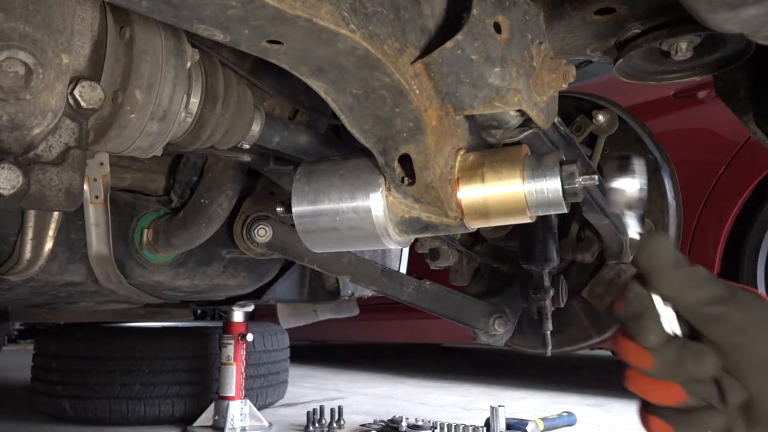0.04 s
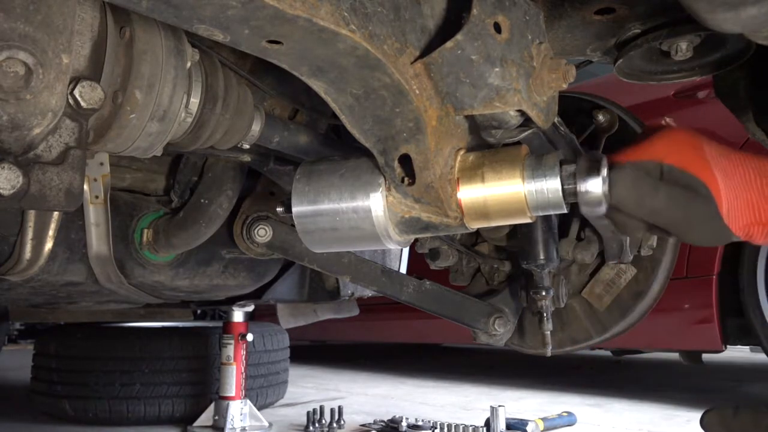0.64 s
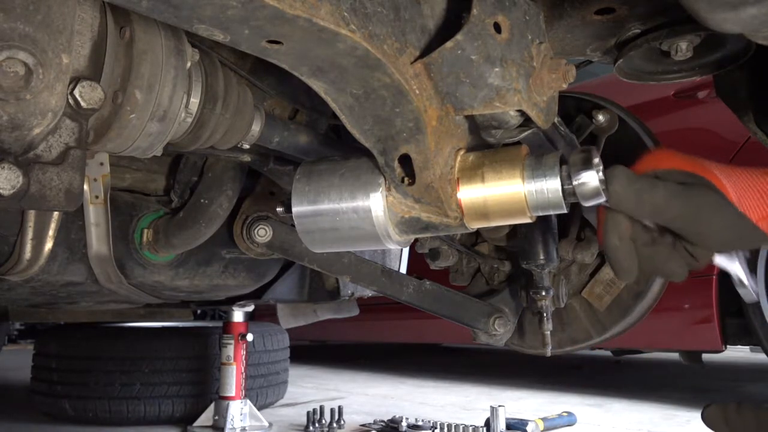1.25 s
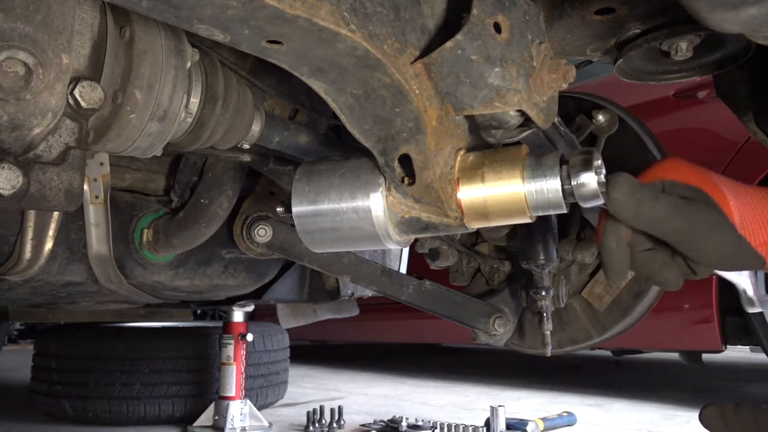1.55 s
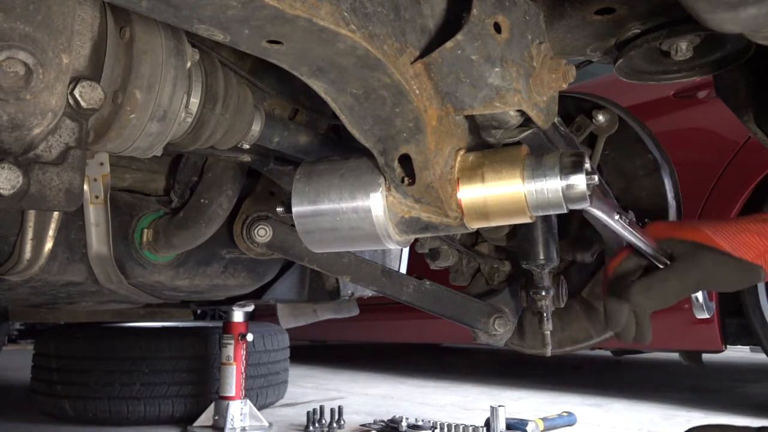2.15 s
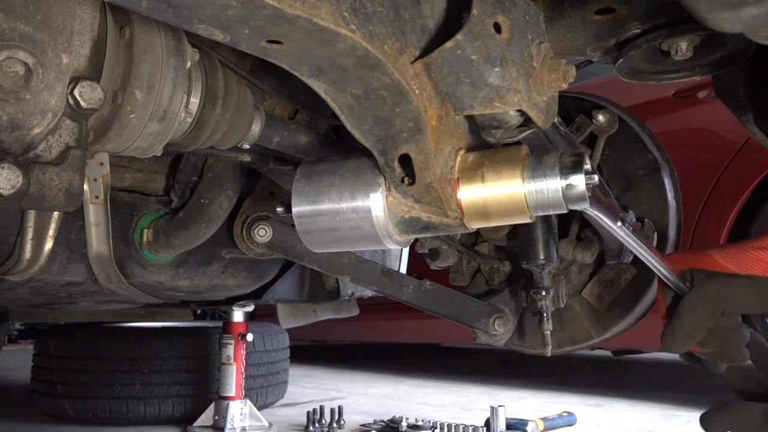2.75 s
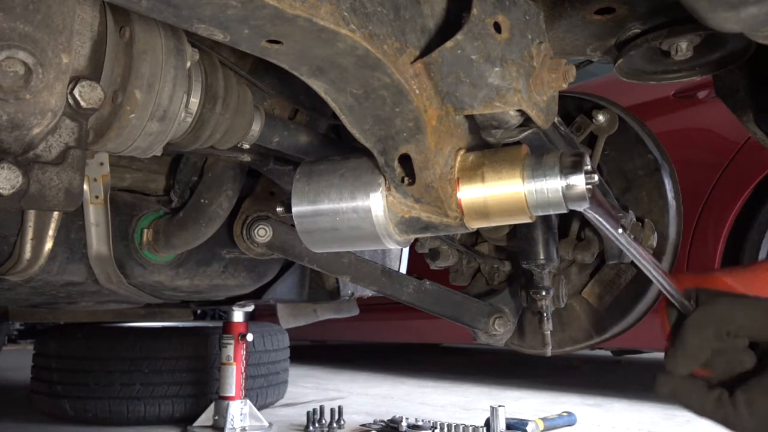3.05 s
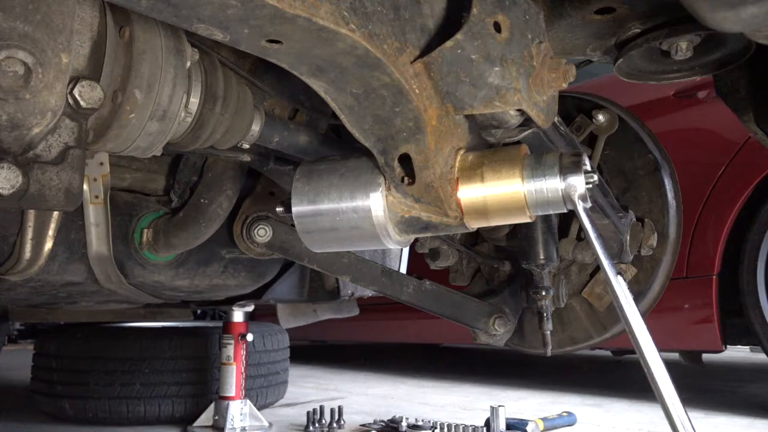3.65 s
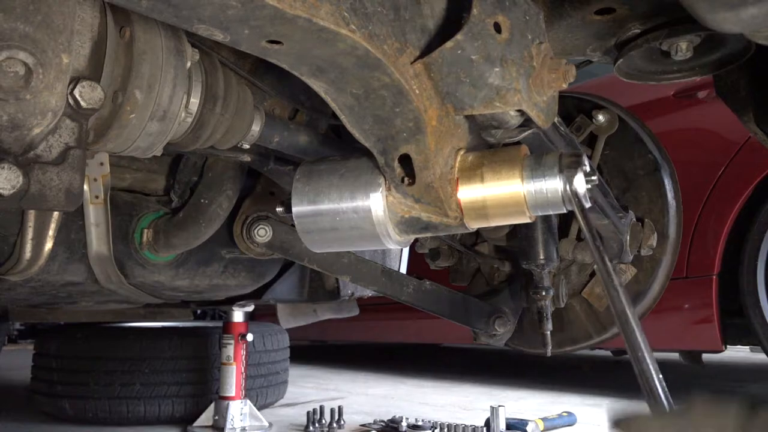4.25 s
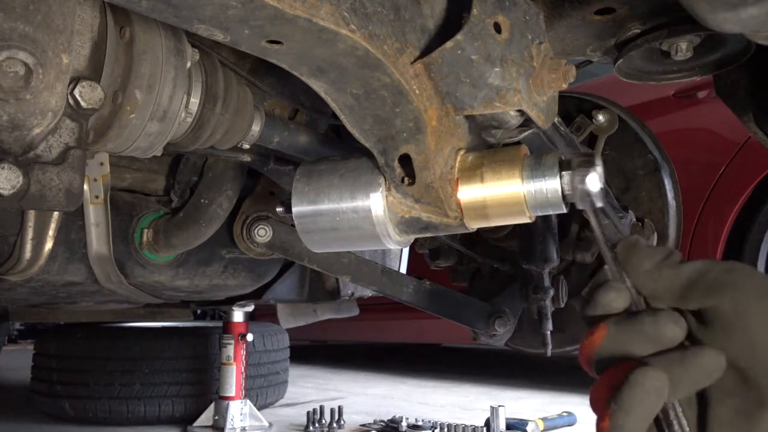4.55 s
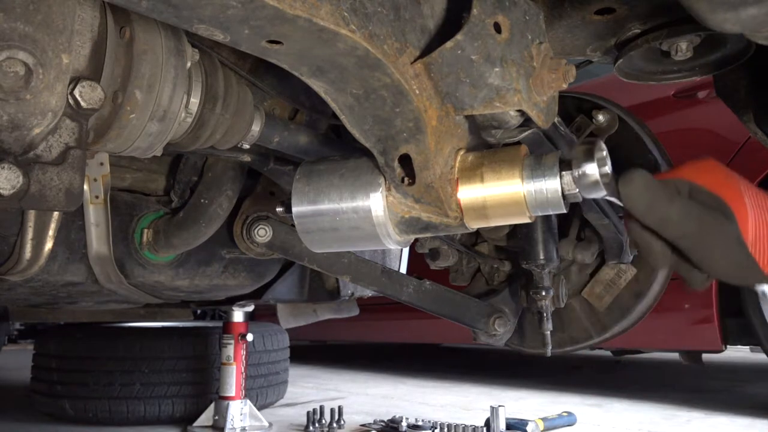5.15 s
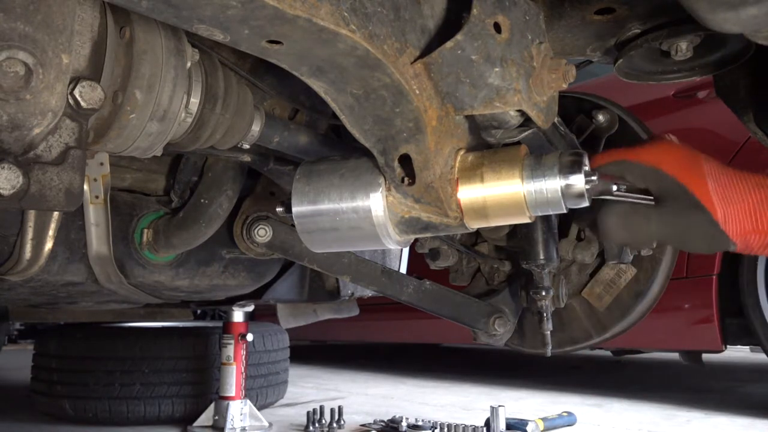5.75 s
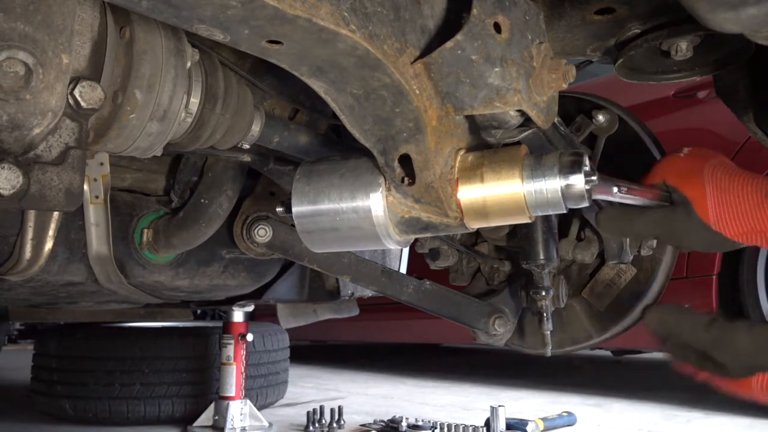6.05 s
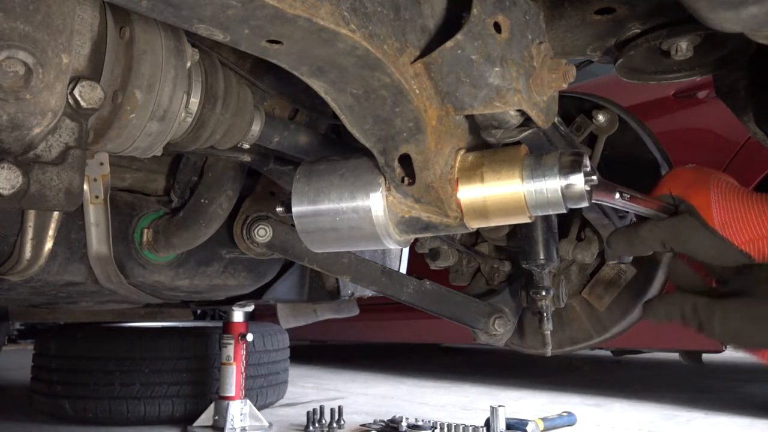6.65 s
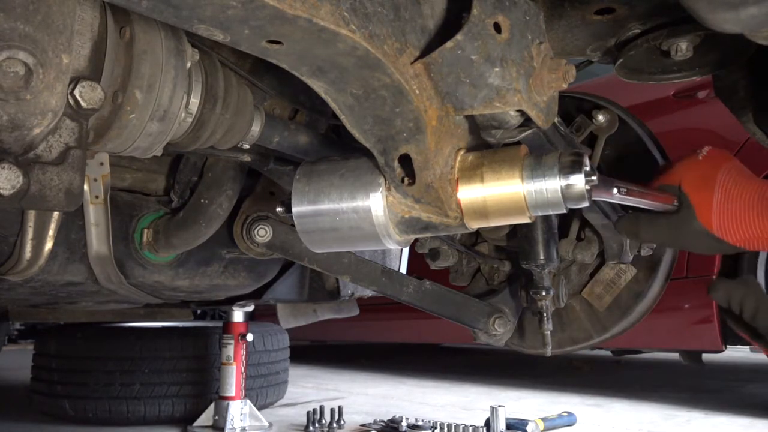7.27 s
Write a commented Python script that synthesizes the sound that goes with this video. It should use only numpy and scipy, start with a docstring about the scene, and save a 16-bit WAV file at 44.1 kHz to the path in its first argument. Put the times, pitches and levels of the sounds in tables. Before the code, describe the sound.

Steel clacks and clinks irregularly as a wrench is set on a nut, each knock ringing briefly through a car's suspension and echoing in the wheel well. Cloth swishes and a thread rubs under load, swelling toward the middle. Then the wrench clanks off and back on, followed by more rustle and a few faint ticks. A low garage hum and thin whine continue underneath, with the impacts centred in front of the microphone.

```python
"""Steel clacks on steel: a ratchet wrench is worked onto the nut of a bushing press under a car,
pulled, lifted off and set on again. Each impact passes through the press into the suspension arm;
wrench, screw and arm ring in their damped normal modes, and the wheel well reverberates.
Between the knocks, sliding friction makes a sleeve rustle and the loaded thread rub,
with a few small taps and two short squeaks, over the low hum and faint whine of a garage."""
import sys
import numpy as np
from scipy import signal
from scipy.fft import rfft, irfft
from scipy.io import wavfile
from scipy.ndimage import uniform_filter1d

SR = 44100
rng = np.random.default_rng(int(sys.argv[2]) if len(sys.argv) > 2 else 0)


def file_out(sig):
    """Save sig as 16-bit WAV at sys.argv[1]."""
    # one column per channel
    cols = np.atleast_2d(sig).T
    # limit, then scale
    lim = np.clip(cols, -1, 1)
    pcm = np.round(lim * 32767).astype(np.int16)
    wavfile.write(sys.argv[1], SR, pcm)


N = 326781


def undb(db):
    """Amplitude ratio of a level in decibels."""
    return 10 ** (np.asarray(db) / 20)


def at(hz, points):
    """Interpolation of an (f/Hz, value) table on a logarithmic frequency axis."""
    f, value = np.transpose(points)
    return np.interp(np.log(hz + 1e-3), np.log(np.sort(f)), value)


def colour(hz, points):
    """Magnitude response of an (f/Hz, level/dB) table, rolling off beyond its ends."""
    low_cut = 1 + (.8 * points[0][0] / (hz + 1e-3)) ** 4
    high_cut = 1 + (.8 * hz / points[-1][0]) ** 8
    return undb(at(hz, points)) / low_cut / high_cut


def resonances(hz, peaks):
    """Magnitude response of Lorentzian peaks or dips, summed in decibels."""
    return undb(sum(db / (1 + (2 * (hz - f) / width) ** 2) for f, width, db in peaks))


def bins(size):
    """Frequencies of the Fourier transform of size samples."""
    return np.arange(size // 2 + 1) * SR / size


def shaped(spectrum, gain, size):
    """Source and filter: the waveform of a weighted spectrum, at unit rms."""
    x = irfft(spectrum * gain, size)
    return x / np.sqrt(np.mean(x ** 2))


def drift(rate_hz):
    """Low-pass random fluctuation with a standard deviation near 1."""
    hold = int(SR / rate_hz)
    steps = np.repeat(rng.standard_normal(N // hold + 1), hold)
    return np.sqrt(2) * uniform_filter1d(uniform_filter1d(steps, hold), hold)[:N]


def decay(t, t60):
    """Exponential damping from t = 0, by 60 dB in t60 seconds."""
    return np.exp(-np.log(1000) * np.maximum(t, 0) / t60)


def add(out, x, start_s):
    """Superposition of x on out from a given time."""
    i = int(round(start_s * SR))
    lo, hi = max(i, 0), min(i + x.shape[1], N)
    out[:, lo:hi] += x[:, lo - i:hi - i]


# Stereo width of the sound field: f/Hz, side minus mid level/dB
STEREO_WIDTH = [(60, -28.5), (130, -24.5), (260, -18), (600, -11.5), (1300, -8), (2600, -8), (5000, -2),
                (12000, -0.5)]

def grains(size, spread_db):
    """Stereo spectrum of noise in tiny uneven bursts; the ears are most coherent in the bass."""
    amplitudes = undb(spread_db * np.repeat(rng.standard_normal(size // 16 + 1), 16)[:size])
    mid, side = rfft(rng.standard_normal((2, size)) * amplitudes)
    side = side * undb(at(bins(size), STEREO_WIDTH))
    return np.array([mid + side, mid - side])


# Spectrum of the room noise: f/Hz, level/dB
ROOM_SPECTRUM = [(13, -34.5), (22, 0), (124, 0.5), (150, -1.5), (253, -13.5), (371, -20), (592, -17),
                 (846, -20.5), (944, -20.5), (2150, -28.5), (2830, -26.5), (3430, -42), (5030, -32),
                 (5770, -41), (11000, -36), (15500, -42)]
# Peaks in its hiss: f/Hz, bandwidth/Hz, gain/dB
HISS_PEAKS = [(3070, 330, 8), (4800, 300, 4)]
# Tones of the hum: f/Hz, level/dB
HUM_TONES = [(119, -61), (430.7, -76.5)]

def garage(noise_db=-51.5, waver_db=.8):
    """Ambient noise: a continuous spectrum of rumble and hiss, plus two phase-modulated tones."""
    hz, t = bins(N), np.arange(N) / SR
    air = shaped(grains(N, spread_db=0), colour(hz, ROOM_SPECTRUM) * resonances(hz, HISS_PEAKS), N)
    hum = sum(np.sqrt(2) * undb(db) * np.sin(2 * np.pi * f * t + .5 * drift(4)) for f, db in HUM_TONES)
    return air * undb(noise_db + waver_db * drift(4.48)) + hum


# Envelope of the background whine: t/s, level/dB
WHINE_ENVELOPE = [(0, -69), (2.4, -66), (3.0, -65), (4.1, -68), (6.1, -67), (6.5, -61), (6.9, -66),
                  (7.41, -68)]

def whine(centre_hz=2870, wander_hz=60):
    """Narrow-band noise: random quadrature modulation of a carrier that wanders in pitch."""
    phase = 2 * np.pi * np.cumsum(centre_hz + wander_hz * drift(6)) / SR
    ears = np.array([drift(300) * np.cos(phase) + drift(300) * np.sin(phase) for _ in range(2)])
    times, db = np.transpose(WHINE_ENVELOPE)
    envelope = np.interp(np.arange(N) / SR, times, undb(db), left=0, right=0)
    return ears * uniform_filter1d(envelope, size=600)


# Spectrum of rubbing cloth: f/Hz, level/dB
CLOTH_SPECTRUM = [(240, -30), (400, -12), (1300, -4.5), (1470, -2.5), (1850, 0.5), (2090, -4), (2970, -4.5),
                  (3460, -8.5), (5230, -4.5), (6680, -7.5), (11800, -3.5), (15500, -18)]
# Sweeps of the sleeve: t/s, duration/s, level/dB, gain of the body from pressure/dB
SLEEVE_SWEEPS = [(0.045, .3, -54, 2), (1.971, 0.26, -41.5, -4), (2.0, 0.83, -64.5, -17),
                 (2.277, .12, -40, -11), (2.6, 0.75, -61.5, -1), (3.076, 0.059, -57, -4),
                 (3.154, 1.07, -54, 1.5), (3.643, .31, -39, 2.5), (4.128, 0.26, -40.5, 3),
                 (4.233, .32, -42.5, -0.5), (4.747, .2, -50.5, -5), (5.725, 0.26, -43, 2.5),
                 (5.845, 0.46, -59, 6), (6.492, 0.27, -68, 9), (6.864, 0.29, -49, 2.5),
                 (7.11, .18, -47.5, -3), (7.21, 0.25, -62, 6)]

def sleeve(gain_db=1.5, flutter_db=1.0, split_hz=4000, skew=1.12, speed_exponent=1.3):
    """Friction noise of fibres grows as a power of speed; pressure adds body below the hiss."""
    hz, t = bins(N), np.arange(N) / SR
    cloth = colour(hz, CLOTH_SPECTRUM) * resonances(hz, [(5280, 380, 6.2)])
    fibres = shaped(grains(N, spread_db=2.5), cloth, N)
    body = irfft(rfft(fibres) / (1 + (hz / split_hz) ** 8), N)
    hiss_power, body_power = 0, 0
    for start_s, length_s, level_db, pressure_db in SLEEVE_SWEEPS:
        progress = np.clip((t - start_s) / length_s, 0, 1)
        speed = np.abs(np.sin(np.pi * progress ** skew))  # rises more slowly than it falls
        amplitude = undb(level_db) * speed ** speed_exponent
        hiss_power += amplitude ** 2
        body_power += (undb(pressure_db) * amplitude) ** 2
    rustle = (fibres - body) * np.sqrt(hiss_power) + body * np.sqrt(body_power)
    return rustle * undb(gain_db + flutter_db * drift(45))


# Spectrum of the rubbing thread: f/Hz, level/dB
THREAD_SPECTRUM = [(150, -40), (250, -14.5), (416, -7), (481, -12), (563, -3), (657, -3.5), (714, -14),
                   (976, -10), (1320, -10), (1690, -16), (3000, -18.5), (3900, -29), (6600, -120)]

def thread(full_at_s=3.729, hold_s=.12, full_db=-40, build_db_per_s=55, ease_db_per_s=165, judder_db=.5):
    """Stick-slip in the thread drives a resonance of the suspension arm, louder with the load."""
    hz, t = bins(N), np.arange(N) / SR - full_at_s
    response = colour(hz, THREAD_SPECTRUM) * resonances(hz, [(575, 140, 4.2)])
    slips = shaped(grains(N, spread_db=5), response, N)
    load_db = build_db_per_s * np.minimum(t, 0) - ease_db_per_s * np.maximum(t - hold_s, 0)
    return slips * undb(full_db + load_db + judder_db * drift(60))


BLOW_SIZE, LEAD_S = 49152, .06  # samples in one impact; time allowed for the slide before a knock

def burst(centre_hz, width_hz, db, t60):
    """A damped resonance under noise excitation: a decaying band of noise."""
    hz, t = bins(BLOW_SIZE), np.arange(BLOW_SIZE) / SR
    band = 1 / (1 + ((hz ** 2 - centre_hz ** 2) / (width_hz * (hz + 1))) ** 2)
    return undb(db) * decay(t, t60) * shaped(grains(BLOW_SIZE, spread_db=8), band, BLOW_SIZE)


# Small dry taps, ticks and two short squeaks: t/s, f/Hz, bandwidth/Hz, level/dB, T60/s, bump level/dB
TAPS_AND_SQUEAKS = [(0.862, 1503, 160, -30.5, .2, -60), (1.001, 1540, 140, -29, .18, -56),
                    (2.536, 286, 129, -42.5, 0.17, -55), (2.77, 600, 250, -51, 0.088, -62),
                    (2.943, 2410, 3000, -53, 0.087, -79), (3.016, 9900, 4950, -48, 0.052, -73),
                    (3.848, 1800, 1300, -18, 0.026, -47), (4.141, 1323, 260, -34, 0.036, -38),
                    (4.156, 1380, 260, -32, 0.062, -31.5), (4.178, 1440, 260, -41, 0.33, -36)]

def taps_and_squeaks(rise_s=.0011):
    """Damped resonance: each tap, tick or squeak is one decaying band over a dull bump."""
    out, t = np.zeros((2, N)), np.arange(BLOW_SIZE) / SR
    for start_s, centre_hz, width_hz, db, t60, bump_db in TAPS_AND_SQUEAKS:
        resonance = burst(centre_hz, width_hz, db, t60)
        bump = burst(centre_hz=165, width_hz=220, db=bump_db, t60=.11)
        add(out, (resonance + bump) * (1 - np.exp(-t / rise_s)), start_s)
    return out


def strike_point(hz, ripple_db=3, spacing_hz=130):
    """Modal excitation depends on position: each new spot favours other resonances."""
    grid = spacing_hz * np.arange(256)
    return undb(ripple_db * np.interp(hz, grid, rng.standard_normal(len(grid))))


# Spectrum of the struck press and suspension arm: f/Hz, level/dB
STEEL_SPECTRUM = [(60, -13), (130, -9), (260, -15.5), (390, -14.5), (490, -12.5), (660, -4), (820, 3),
                  (1160, 0.5), (1290, -8), (1550, -3), (3000, -10), (5500, -14), (11600, -25),
                  (12500, -36.5), (15000, -42)]
# Resonances of the socket and press cups: f/Hz, bandwidth/Hz, gain/dB
CUP_RESONANCES = [(2238, 33, 5.5), (2580, 220, 5), (3042, 200, 5), (3950, 300, 4.5), (4316, 35, 13),
                  (5250, 840, 7), (8420, 280, 5.5), (11100, 85, 10.5), (11400, 220, 13)]
# Directivity of the blows: f/Hz, left minus right level/dB
DIRECTIVITY = [(150, -0.4), (500, 1.6), (1100, 2.5), (2500, 1.4), (5000, 0.2), (9000, 0.5), (14000, -2)]
# Five bands, thud to tick: low f/Hz, high f/Hz, echo level/dB, early T60/s, late T60/s, late level/dB
BANDS = [(86, 450, -3.5, 0.29, 0.98, 10.5), (440, 1330, -3.5, .15, 0.49, 7.5),
         (1430, 3130, 0.3, 0.082, 0.78, -1), (3270, 6400, -2.5, 0.067, 0.75, -7),
         (6360, 15500, -2.5, 0.11, 0.8, -8)]

def clack(drive_db, after_db, slide_s, hold_s=.0092):
    """Dense modes overlap into noise and reverberate in the wheel well with a double-slope decay."""
    hz, t = bins(BLOW_SIZE), np.arange(BLOW_SIZE) / SR - LEAD_S
    balance = undb(np.outer([.5, -.5], at(hz, DIRECTIVITY)))
    steel = colour(hz, STEEL_SPECTRUM) * resonances(hz, CUP_RESONANCES) * balance
    chatter = grains(BLOW_SIZE, spread_db=3) * strike_point(hz)
    blow = 0
    for db, (low_hz, high_hz, echo_db, early_t60, late_t60, late_db) in zip(drive_db, BANDS):
        band = steel / np.sqrt((1 + (low_hz / (hz + 1)) ** 10) * (1 + (hz / high_hz) ** 10))
        early = decay(t - hold_s, early_t60)
        late = undb(after_db + late_db) * decay(t, late_t60)
        blow += undb(db + echo_db) * np.hypot(early, late) * shaped(chatter, band, BLOW_SIZE)
    return blow * np.exp(np.minimum(t, 0) / slide_s)  # the slide grows into the blow


def ring(modes, drive_db, scatter_db, build_s, t60_scale=1):
    """Modal superposition: damped sinusoids build up while the contact chatters."""
    t = np.arange(BLOW_SIZE - int(LEAD_S * SR)) / SR
    out, ears = np.zeros((2, len(t))), np.array([[1], [-1]])
    edges_hz = [band[1] for band in BANDS[:-1]]
    for hz, db, t60 in modes:
        angle, ear_offset, scatter, grip = rng.standard_normal(4)
        t60 = t60 * t60_scale * undb(-abs(2 * grip))  # the grip damps each mode by chance
        age = t[:int(t60 * SR)]
        phase = np.pi * angle + ears * ear_offset * undb(at(hz, STEREO_WIDTH))
        level_db = db + drive_db[np.searchsorted(edges_hz, hz)] + scatter_db * scatter
        peak = np.sqrt(2) * undb(level_db + ears * at(hz, DIRECTIVITY) / 2)
        out[:, :len(age)] += peak * decay(age, t60) * np.sin(2 * np.pi * hz * age + phase)
    return out * (1 - np.exp(-t / build_s))


# Normal modes of the suspension arm: f/Hz, level/dB, T60/s
ARM_MODES = [(95, -20, 1.0), (181, -18, 1.2), (400, -11, .4), (441, -18, .9), (503, -23, .62),
             (664, -17, .25), (711, -23, .6), (786, -20, .6), (836, -12, .32), (908, -18, .42),
             (972, -12, .3), (1022, -12, .2), (1072, -14, .33), (1174, -5, .2), (1270, -24, .47),
             (1348, -13, .3), (1503, -11, .22), (1846, -15, .39), (2155, -11, .28), (2229, -22, .6),
             (2603, -12, .25), (3047, -26, .7)]

def suspension_arm(drive_db):
    """Structure-borne sound: the blow passes through the press and sets the arm ringing."""
    return ring(ARM_MODES, drive_db - 2, scatter_db=3.5, build_s=.0091)


# Normal modes of the forcing screw and its nut: f/Hz, level/dB, T60/s
SCREW_MODES = [(786, -25.5, .7), (3741, -24, .22), (4264, -15.5, .15), (4750, -28, .4), (5580, -9, 0.11),
               (5900, -4.5, .22), (8737, -18, .13), (9280, -10, 0.26), (10400, -9, .18),
               (11500, -12.5, 0.15), (14493, -20, .17)]

def screw(drive_db, freedom, loose_db=-11):
    """Mechanical coupling: the tick band drives the screw, weakly if the wrench hangs free."""
    tick_db = np.full_like(drive_db, drive_db[-1])
    return ring(SCREW_MODES, tick_db + freedom ** 2 * loose_db, scatter_db=7, build_s=.00078)


# Normal modes of the wrench: f/Hz, level/dB, T60 when hanging free/s
WRENCH_MODES = [(3640, -18, .15), (5363, -5.5, 0.23), (6540, -13.5, 0.72), (7460, -10.5, 0.4),
                (8528, -1, .22), (10900, -8.5, 0.65), (11742, -12, 0.52), (13425, -24, .25)]

def wrench(drive_db, freedom, gap_s, held_db=-10, free_gain_db=16.5, seat_t60=.12):
    """Contact damping: a loosely held wrench rings louder and longer, until the next contact."""
    ringing = ring(WRENCH_MODES, drive_db + held_db + freedom * free_gain_db,
                   scatter_db=-.5, build_s=.00041, t60_scale=np.clip(freedom, .35, 1))
    t = np.arange(ringing.shape[1]) / SR
    return ringing * decay(t - gap_s, seat_t60)


# Response of each band, thud to tick: level/dB, slope with hardness/(dB/dB), slope with weight/(dB/dB)
BAND_RESPONSE = [(0.5, 0, 1), (-3.5, -0.5233, 0.1646), (-0.78, 0, 0), (-5, 0.19, -.5), (-0.77, 1.14, 0)]
# Steel contacts: t/s, level/dB, hardness/dB (treble of a sharp contact), weight/dB (bass as the press
# shifts), after-ring level/dB, slide time constant/s, freedom of the wrench (0 held, 1 hanging)
STEEL_CONTACTS = [(0.022, -38, -7, 5.5, -21, 0.012, .2), (0.042, -29.5, -15, -5.5, -19, .0024, .7),
                  (0.3387, -30.5, 8.5, -9.5, -12, .0006, .1), (0.45, -40.5, -7.5, -11, -20.5, .017, .3),
                  (0.4991, -30, 13, -12, -9, .0005, .1), (0.687, -30.5, -2.5, -15, -25, 0.0036, .4),
                  (0.699, -23.5, -2, -20.5, -20.5, 0.0022, .6),
                  (0.7225, -20.5, -9, -18.5, -14.5, 0.00076, .4), (0.733, -23.5, -16, -9.5, -18, .0025, .3),
                  (0.868, -35, -14, -6, -28, 0.021, .3), (0.885, -20, -13.5, -17, -12.5, .0009, .2),
                  (0.997, -34.5, -14.5, -7, -18, 0.002, .4), (1.062, -21, -14.5, -10, -24.5, 0.0079, .2),
                  (1.071, -22.5, -25, -12, -23.5, 0.00077, .5), (1.098, -30, -16, -2, -23.5, 0.0043, .37),
                  (1.2553, -40.5, -24.5, -8, -14, .0004, .2), (1.309, -22, -23, -12.5, -18.5, .0004, .1),
                  (1.414, -36, -20, -0.5, -23, .003, .1), (1.472, -51, -23, 12.5, -22, 0.0072, .3),
                  (1.64, -29, -27, 1.5, -37, .002, .2), (1.77, -37.5, -27, 7.5, -30, .0006, .2),
                  (1.79, -29, -19, 2, -29, 0.0013, .3), (1.8197, -24.5, -11, -19, -3.5, 0.00045, .15),
                  (4.351, -47.5, -14.5, 5, -30, 0.01, .3), (4.436, -43, -24.5, 4, -29, 0.01, .3),
                  (4.471, -35.5, -20, -6.5, -29.5, .0005, .3), (4.586, -27.5, -15.5, -1.5, -26, 0.0035, .1),
                  (4.602, -25, -18, -3.5, -32, .004, .6), (4.668, -19.5, -18, -3.5, -13.5, 0.00027, 0.94),
                  (5.017, -53, -7.5, 0.5, -36.5, .001, .1), (5.105, -28.5, -3, -13, -14.5, 0.0014, 1),
                  (5.18, -25, 2, -12, -8, .0007, .55), (5.2555, -21.5, -7.5, -14.5, -16.5, 0.0015, .65),
                  (5.413, -21.5, -18, -4.5, -35, .0034, .3), (5.507, -38.5, -22.5, 6.5, -26, .0085, .25),
                  (5.599, -23, -9, -16, -5.5, .001, .2), (7.002, -55, -2, -2, -22, .002, .3),
                  (7.127, -42, 1.5, -11, -14, .013, .3), (7.375, -55, -11, -2, -7, 0.0042, .3)]

def knocks():
    """Impact excitation: a hard contact ticks, a soft one clunks, a heavy one thuds."""
    out = np.zeros((2, N))
    base_db, by_hardness, by_weight = np.transpose(BAND_RESPONSE)
    next_times = [contact[0] for contact in STEEL_CONTACTS[1:]] + [N / SR]
    for contact, next_s in zip(STEEL_CONTACTS, next_times):
        start_s, level_db, hardness_db, weight_db, after_db, slide_s, freedom = contact
        drive_db = level_db + base_db + hardness_db * by_hardness + weight_db * by_weight
        add(out, clack(drive_db, after_db, slide_s), start_s - LEAD_S)
        add(out, suspension_arm(drive_db), start_s)
        add(out, screw(drive_db, freedom), start_s)
        add(out, wrench(drive_db, freedom, gap_s=next_s - start_s), start_s)
    return out


def scene():
    """Interaural delay: knocks arrive from ahead; rubbing and background reach the left ear later."""
    left, right = sleeve() + thread() + garage() + whine()
    delayed_left = np.append(0, left[:-1])
    return knocks() + taps_and_squeaks() + np.array([delayed_left, right])


# Notches in the microphone's response: f/Hz, bandwidth/Hz, gain/dB
MICROPHONE_NOTCHES = [(3400, 210, -3), (5855, 90, -27.5), (6663, 170, -20), (7720, 150, -7.5)]

def record(dry, cutoff_hz=15900):
    """Transducer response: the microphone notches the treble, saturates softly and limits the band."""
    notched = irfft(rfft(dry) * resonances(bins(N), MICROPHONE_NOTCHES), N)
    saturated = np.tanh(.8 * notched) / .82
    low_pass = signal.ellip(10, .2, 70, cutoff_hz, fs=SR, output="sos")
    return signal.sosfilt(low_pass, saturated)


dry = scene()
out = record(dry)
file_out(out)
```